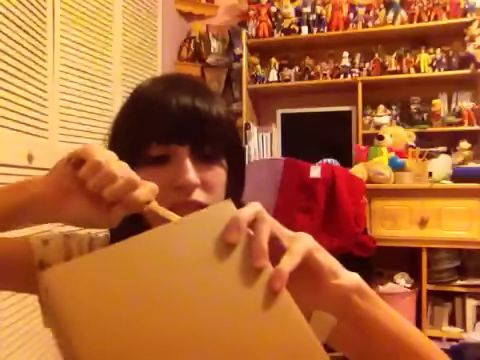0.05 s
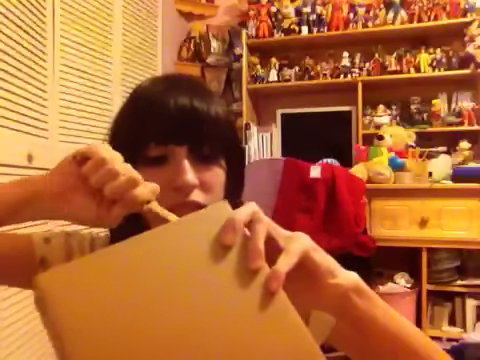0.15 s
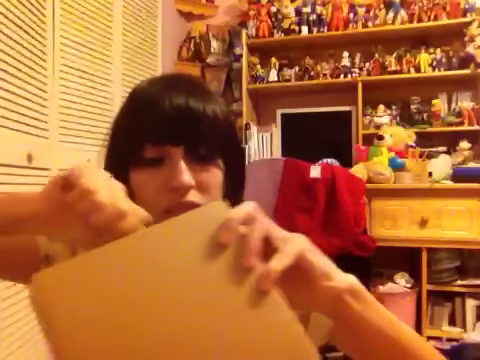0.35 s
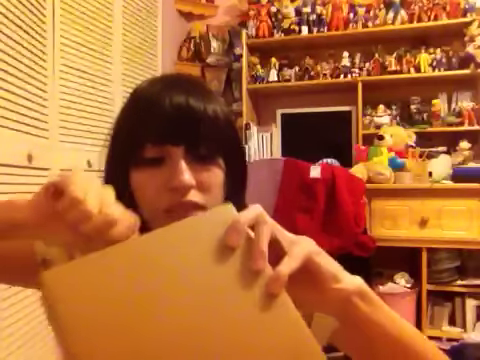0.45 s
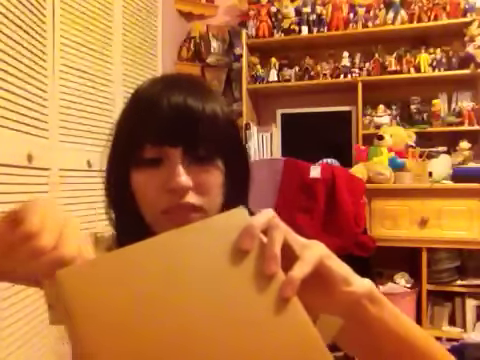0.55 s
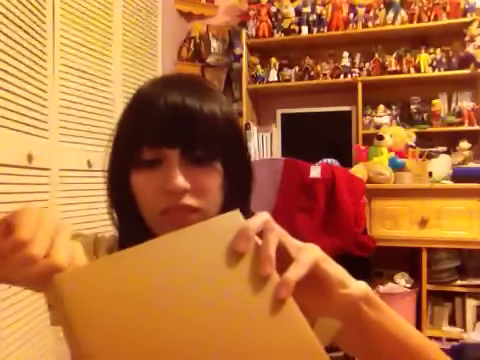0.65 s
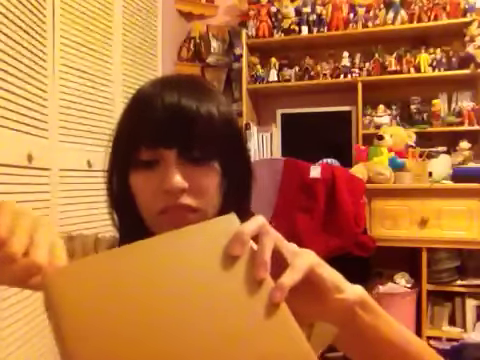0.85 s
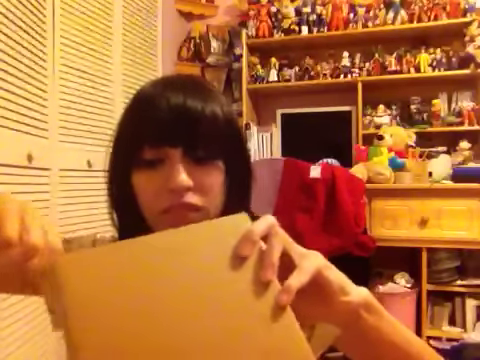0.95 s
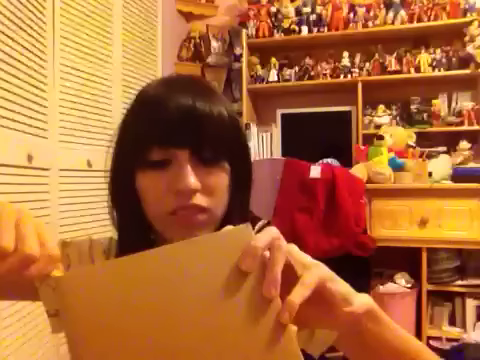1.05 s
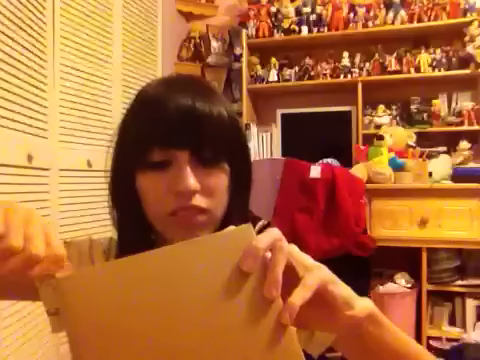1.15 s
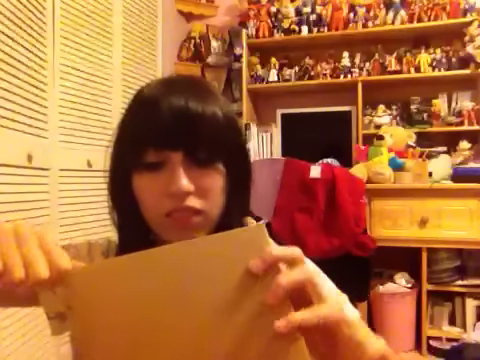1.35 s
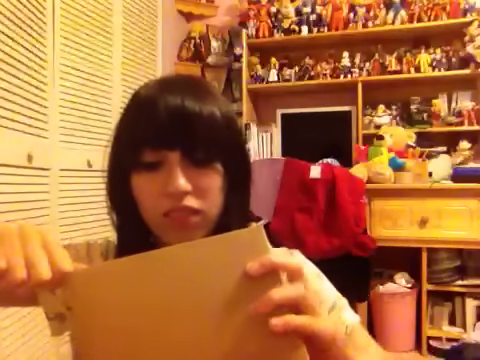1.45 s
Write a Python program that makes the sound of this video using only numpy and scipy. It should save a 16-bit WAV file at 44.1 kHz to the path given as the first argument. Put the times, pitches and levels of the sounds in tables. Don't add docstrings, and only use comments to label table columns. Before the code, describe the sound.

A blade cuts into a taped cardboard box. Quiet room hush, then a loud crisp snap at 0.24 s with a brief ring, and a hollow knock at 0.32 s, with rough scraping fading by 0.47. A softer push with dull knocks and creaking follows at 0.52-0.68. Faint dragging near 0.75, a tiny tick at 0.93, short raspy sawing at 1.05-1.15, and weak ticks and rustle from 1.24 to 1.5. Close, thin microphone, little echo.

```python
import sys
import numpy as np
from scipy import signal
from scipy.io import wavfile
from scipy.ndimage import uniform_filter1d

SR = 44100
rng = np.random.default_rng(int(sys.argv[2]) if len(sys.argv) > 2 else 0)


def gain_from_db(level_db):
    decades = np.asarray(level_db, float) / 20
    return 10 ** decades


def pcm_store(signal):
    levels = np.round(np.clip(np.atleast_2d(signal), -1, 1) * 32767)
    wavfile.write(sys.argv[1], SR, levels.astype(np.int16).T)


N = 66150


def evened(x):
    return x / np.sqrt(np.mean(x ** 2) + 1e-20)


def read(points, hz):
    f, value = np.transpose(points)
    return np.interp(np.log(hz + 1), np.log(f + 1), value)


def follow(strokes, column):
    rows = np.concatenate(strokes)
    times = rows[:, 0] + 1e-6 * np.arange(len(rows))
    return np.interp(np.arange(N) / SR, times, rows[:, column])


def after_start(strokes):
    return np.arange(N) > strokes[0][0][0] * SR


def add(mix, s, sound):
    part = mix[round(s * SR):][:len(sound)]
    part += sound[:len(part)]


def resonate(x, hz, width):
    turn = np.exp(2j * np.pi * np.cumsum(hz * np.ones(len(x))) / SR)
    r = np.exp(-np.pi * width / SR)
    return 2 * (turn * signal.lfilter([1 - r], [1, -r], x / turn)).real


def colour(x, spectrum, patchy_db, size):
    overlap = size * 3 // 4
    hz, t, z = signal.stft(x, SR, nperseg=size, noverlap=overlap)
    patches = uniform_filter1d(rng.standard_normal(z.shape), size // 50, 0)
    patches = evened(uniform_filter1d(patches, 6000 // size, 1))
    z = z * gain_from_db(read(spectrum, hz)[:, None] + patchy_db * patches)
    return evened(signal.istft(z, SR, nperseg=size, noverlap=overlap)[1][:N])


def grains(per_s, spread_db):
    u, e, sign = rng.random(N), rng.exponential(1, N), rng.choice([-1., 1.], N)
    return sign * gain_from_db(spread_db * np.minimum(e, 5)) * (u < per_s / SR)


def ring(modes):
    t = np.arange(8000) / SR
    return sum(gain_from_db(db - 60 * t / t60) * np.sin(2 * np.pi * hz * t) for hz, db, t60 in modes)


# t/s, peak level/dB, f/Hz, t60/s
CRACKS = [(0.2416, -31, 11050, .006), (0.242, -10, 4220, 0.0035), (0.2419, -11.5, 6780, 0.0044),
          (.2426, -18, 1910, 0.0043), (.2450, -4.5, 1100, 0.002), (.2480, -22, 2580, 0.0068),
          (0.2503, -24.5, 7060, 0.003), (0.2532, -22, 3540, 0.004), (0.266, -30, 6500, 0.0038),
          (0.3214, -27.5, 7500, 0.0051), (0.3212, -31, 12600, .004), (0.2414, -29, 12800, 0.0071),
          (0.322, -30.5, 4210, 0.015), (0.189, -62, 3000, 0.0071), (0.903, -50, 1490, 0.0096),
          (0.9355, -50, 6470, 0.0015), (0.9328, -46, 11000, .002), (1.237, -53, 5930, 0.0056),
          (1.237, -61, 4680, .01), (1.237, -59, 12000, 0.0027), (1.238, -52, 1100, 0.015),
          (1.246, -52.5, 11000, .003), (1.405, -52, 6940, 0.0023)]
# f/Hz, level/dB, t60/s
BLADE_MODES = [(807, -4, 0.056), (1122, -13, 0.048), (1990, -1, 0.021), (2410, -9.5, 0.22),
               (2740, -5.5, 0.073), (3400, -14, 0.026), (3840, -7.5, 0.045), (4670, 0, 0.04),
               (7720, -5, 0.0376)]


def cracks():
    blade_hit_s, blade_db = .2422, -27.5
    out, t = np.zeros(N), np.arange(1500) / SR
    puffs = rng.standard_normal((len(CRACKS), len(t)))
    for (s, db, hz, t60), puff in zip(CRACKS, puffs):
        noise = evened(resonate(resonate(puff, hz, 0.83 * hz), hz, 0.96 * hz))
        burst = np.sin(2 * np.pi * hz * t) + 0.69 * noise
        rise = 1 - np.exp(-t * hz)
        add(out, s, rise * gain_from_db(db + 1 - 60 * t / t60) * burst)
    add(out, blade_hit_s, gain_from_db(blade_db) * ring(BLADE_MODES))
    return out


# t/s, level/dB, fizz level/dB
STROKES = [
    [(.243, -35.5, 7.5), (.254, -48, 15), (.26, -37, -3), (.314, -39, -6), (.323, -37, 2),
     (.356, -47.5, -4.5), (.43, -54.5, -4), (.47, -59.5, -5)],
    [(.514, -57, -11), (.556, -42, -3.5), (.606, -43.5, -3), (.69, -72.5, -0.5)],
    [(.744, -56.5, -1.5), (.784, -62.5, -1.5), (.832, -61, 1.5), (.885, -71.5, 10.5)],
    [(.96, -55.5, -3.5), (1.048, -60, 3.5), (1.056, -46.5, -3), (1.07, -45, 6), (1.1, -49.5, 0),
     (1.18, -71, -14)],
    [(1.228, -75.5, 3.5), (1.25, -69, 2.5), (1.32, -62.5, 0.5), (1.5, -67, 7.5)],
]
# f/Hz, level/dB per Hz
FIBRE_COLOUR = [(350, -9.5), (600, -8.5), (855, -10), (1620, -12.5), (2130, -15.5), (3380, -14),
                (5290, -17.5), (12100, -21), (15500, -25.5)]


def scrape():
    fizz_hz = 3000
    x = colour(grains(per_s=7000, spread_db=2.5), FIBRE_COLOUR, patchy_db=2.7, size=512)
    low = signal.sosfiltfilt(signal.butter(1, fizz_hz, fs=SR, output="sos"), x)
    fizz = gain_from_db(follow(STROKES, column=2)) * (x - low)
    return after_start(STROKES) * gain_from_db(follow(STROKES, column=1)) * (low + fizz)


# t/s, peak level/dB, contact/s
BLOWS = [(0.146, -54.5, 0.0028), (0.322, -8.5, 0.0022), (0.338, -42, 0.0045), (0.384, -32, 0.0027),
         (0.534, -28, 0.0047), (0.557, -29.5, 0.006), (0.581, -46, 0.0037), (0.702, -38.5, 0.0073),
         (0.749, -47, 0.0025), (1.097, -48, 0.0048), (1.327, -44.5, 0.0035), (1.439, -54, 0.003)]
# f/Hz, level/dB, t60/s
BLOW_MODES = [(280, -13.5, 0.13), (473, -6.5, 0.077), (660, -10, 0.1), (720, 2.5, 0.047), (989, -6, 0.036),
              (1189, 6.5, 0.017), (1600, 1.5, 0.016)]


def knocks():
    spot_shift, spot_db = .006, 1.5
    out, t = np.zeros(N), np.arange(8000) / SR
    spots = rng.uniform(-1, 1, (len(BLOWS), len(BLOW_MODES)))
    for (s, db, contact), where in zip(BLOWS, spots):
        modes = [(hz * (1 + spot_shift * u), level + spot_db * u, t60)
                 for (hz, level, t60), u in zip(BLOW_MODES, where)]
        add(out, s, 0.31 * gain_from_db(db) * (1 - np.exp(-t / contact)) * ring(modes))
    return out


# t/s, peak level/dB, f/Hz, t60/s
CREASES = [(.3325, -36, 1510, .02), (.3385, -26.5, 704, 0.037), (.3505, -31, 480, 0.041),
           (.358, -33, 700, 0.02), (.3685, -36, 556, 0.022), (.385, -36, 682, 0.035),
           (.382, -39.5, 1204, .04), (.43, -44, 1250, 0.028), (.506, -48, 697, 0.041),
           (.549, -46, 768, .06), (.557, -29, 705, 0.033), (.58, -35, 535, .04), (.593, -35, 708, 0.037),
           (.613, -43.5, 1600, 0.027), (.627, -42, 567, .03), (.635, -41.5, 378, .04),
           (.2505, -27, 3520, .006), (.2525, -28, 12100, .005), (.254, -37, 5060, 0.0032),
           (.2682, -35, 7100, .004), (0.2703, -30, 2600, .006), (1.062, -43.5, 1400, .012),
           (1.0695, -38, 1732, 0.032), (1.0696, -36.5, 4070, 0.012), (1.0666, -41.5, 4900, 0.013),
           (1.094, -44, 4030, .01), (1.099, -43, 416, 0.016), (.2422, -16.5, 5150, 0.0052),
           (0.2425, -21.5, 3110, 0.0055), (.2425, -24, 798, 0.035), (0.3213, -30, 1460, 0.008),
           (.9035, -59, 3200, .004), (.9351, -45, 4800, .003), (.9351, -51, 7200, .003),
           (1.056, -40, 4340, 0.011), (1.074, -37, 3700, .01), (1.0777, -43, 5300, 0.0068),
           (1.2366, -51, 4520, .02), (1.237, -57, 8500, .004), (1.2368, -44, 6200, 0.0039),
           (1.2366, -48, 5200, .0035), (.9351, -52, 3500, .003), (.2465, -26, 11900, .006),
           (1.066, -38, 4460, 0.0089), (.988, -48, 1600, .012), (1.2455, -56, 4500, .008),
           (1.2565, -60, 4650, .006)]


def creases():
    rise_cycles = 1.63
    out, t = np.zeros(N), np.arange(4000) / SR
    for s, db, hz, t60 in CREASES:
        rise = 1 - np.exp(-t * hz / rise_cycles)
        add(out, s, rise * gain_from_db(db + 2 - 60 * t / t60) * np.sin(2 * np.pi * hz * t))
    return out


# t/s, level/dB, lowest panel f/Hz, upper panels level/dB
GRIP = [
    [(.335, -46.5, 290, 14), (.36, -48, 300, -4), (.4, -63, 300, -8), (.45, -68, 300, 7),
     (.5, -56.5, 290, 2)],
    [(.524, -49, 280, 5.5), (.54, -38, 280, -5), (.56, -39.5, 300, 4.5), (.6, -47, 300, 3),
     (.635, -46, 360, -18), (.648, -62, 350, -6), (.69, -66, 343, -2)],
    [(.75, -57, 372, -2), (.8, -61, 334, -0.5), (.89, -65.5, 305, -3)],
    [(.98, -57.5, 374, 0.5), (1.04, -50.5, 381, -1.5), (1.07, -69, 374, 4), (1.102, -46, 302, -4),
     (1.113, -58, 300, -1.5), (1.17, -66.5, 300, 1.5)],
    [(1.25, -71.5, 334, 7), (1.33, -65.5, 313, 2.5), (1.44, -59.5, 327, -10.5), (1.5, -64.5, 310, -12)],
]
# f/Hz, width/Hz, level/dB
PANELS = [(300, 46.4, 0), (486.5, 41, -4.5), (646, 33, -4), (727, 53, -4.5), (957, 100, -12.5),
          (1220, 80, -10.5), (1602, 114, -14.5), (1965, 41, -12.5)]


def creak():
    grip_hz, grip_pull = 310, .15
    slips = evened(grains(per_s=900, spread_db=2.5))
    drive = slips * gain_from_db(follow(GRIP, column=1)) * after_start(GRIP)
    lowest_hz = follow(GRIP, column=2)
    pull = (lowest_hz / grip_hz) ** grip_pull
    upper = np.zeros(N)
    for k, (hz, width, db) in enumerate(PANELS[1:]):
        upper += (-1) ** k * gain_from_db(db) * resonate(drive, hz * pull, width)
    lowest = resonate(drive, lowest_hz, PANELS[0][1])
    return gain_from_db(20) * (lowest - gain_from_db(follow(GRIP, column=3)) * upper)


# t/s, length/s, from f/Hz, to f/Hz
JUDDERS = [(.956, .026, 11300, 11000), (1.058, .024, 1250, 1900), (1.053, .028, 3100, 3900),
           (1.41, .035, 1130, 1150), (.6, .02, 3300, 3300), (.8, .05, 4800, 4500), (1.46, .04, 7000, 7000),
           (.95, .05, 2700, 2700), (.98, .075, 520, 760), (1.345, .045, 1150, 1180), (.73, .05, 340, 350),
           (1.088, .025, 320, 290), (.528, .028, 280, 285), (.575, .03, 2300, 2350)]
JUDDER_DB = [-58.5, -48, -48, -61, -51.5, -67, -66, -66, -56.5, -66, -58.5, -49, -47, -51.5]


def chatter():
    out = np.zeros(N)
    puffs = rng.standard_normal((len(JUDDERS), 7000))
    for (s, length, from_hz, to_hz), db, puff in zip(JUDDERS, JUDDER_DB, puffs):
        u = np.minimum(np.arange(7000) / SR / length, 1)
        hz = from_hz + (to_hz - from_hz) * u
        width = .085 * from_hz
        tone = resonate(resonate(puff, hz, width), hz, 2 * width)
        add(out, s, gain_from_db(db) * np.sin(np.pi * u ** 0.77) * evened(tone))
    return out


# t/s, f/Hz
BUMPS = [
    (.243, 70),
    (.55, 90),
    (1.088, 130),
    (.362, 80),
    (.595, 115),
    (.63, 110),
    (.735, 80),
    (.845, 110),
    (1.075, 65),
]
BUMP_DB = [-70, -75, -72, -82, -75, -80, -80, -86, -74]


def thumps():
    out, t = np.zeros(N), np.arange(3000) / SR
    push = t / .01 * np.exp(-t / .01)
    for (s, hz), db in zip(BUMPS, BUMP_DB):
        add(out, s, gain_from_db(db + 23) * push * np.sin(2 * np.pi * hz * t))
    return out


# f/Hz, t60/s
ROOM_DECAY = [(200, 0.24), (800, 0.21), (3000, 0.25), (8000, 0.22), (14000, 0.13)]


def room(x):
    echoes = np.zeros(SR // 2)
    at = np.arange(200, SR // 2 - 20, 20)
    echoes[at + rng.integers(0, 20, len(at))] = rng.choice([-1., 1.], len(at))
    hz, t, z = signal.stft(echoes, SR, nperseg=256)
    decay = gain_from_db(-60 * t / read(ROOM_DECAY, hz)[:, None])
    tail = signal.istft(z * decay, SR, nperseg=256)[1]
    return signal.fftconvolve(x, tail / np.linalg.norm(tail))[:N]


# f/Hz, level/dB per Hz
HUSH_COLOUR = [(40, -4), (110, -6.5), (230, 0.5), (420, -9), (1200, -13), (5000, -18), (10000, -23),
               (15500, -18)]


def hush():
    return gain_from_db(-68) * colour(rng.standard_normal(N), HUSH_COLOUR, patchy_db=1.0, size=2048)


def scene():
    thin_edge = signal.butter(2, 330, "high", fs=SR, output="sos")
    edge = signal.sosfilt(thin_edge, cracks() + scrape())
    box = edge + knocks() + creases() + creak() + chatter()
    return (box + gain_from_db(-11) * room(box) + thumps() + hush())[None]


def top_cut(x):
    return signal.sosfilt(signal.butter(12, 16520, fs=SR, output="sos"), x)


def record(dry):
    low_cut_hz, edge_hz, leak_db = 129, 15300, -41
    thin = signal.sosfilt(signal.butter(3, low_cut_hz, "high", fs=SR, output="sos"), dry)
    band_limit = signal.firwin(767, edge_hz, window=("kaiser", 7), fs=SR)
    cut = signal.oaconvolve(thin, band_limit[None], "same")
    return top_cut(cut + gain_from_db(leak_db) * thin)


dry = scene()
out = record(dry)
pcm_store(out)
```